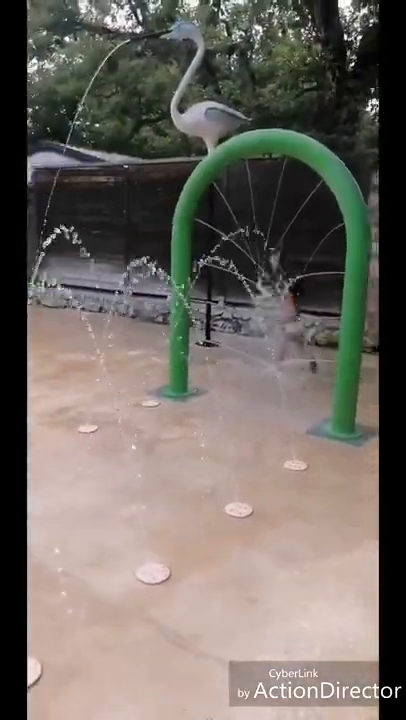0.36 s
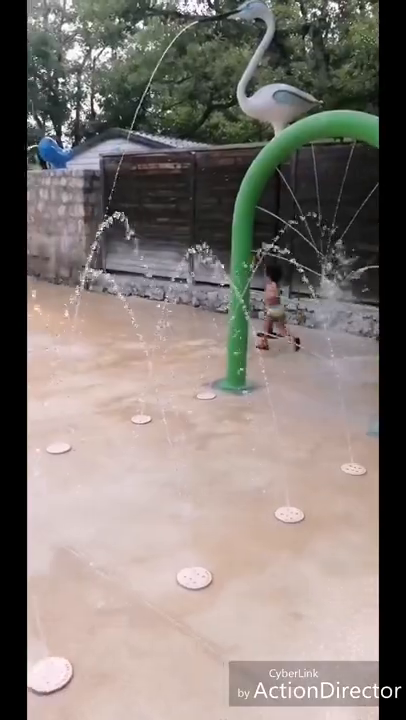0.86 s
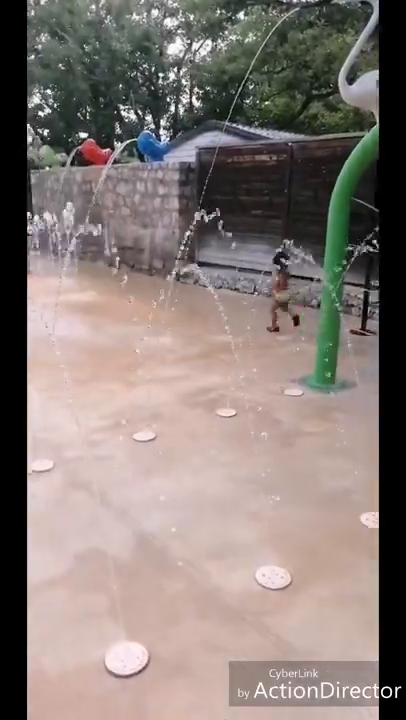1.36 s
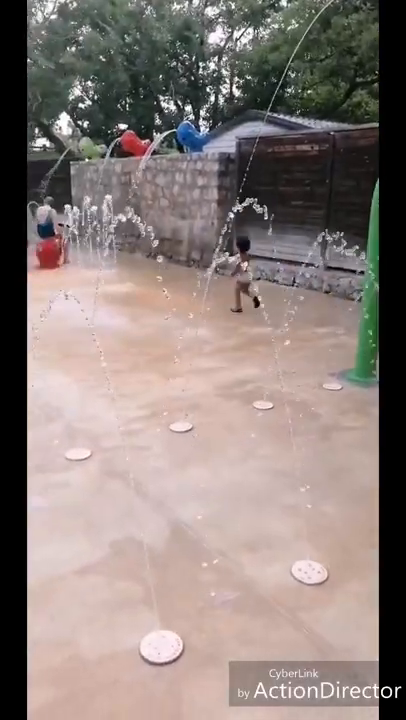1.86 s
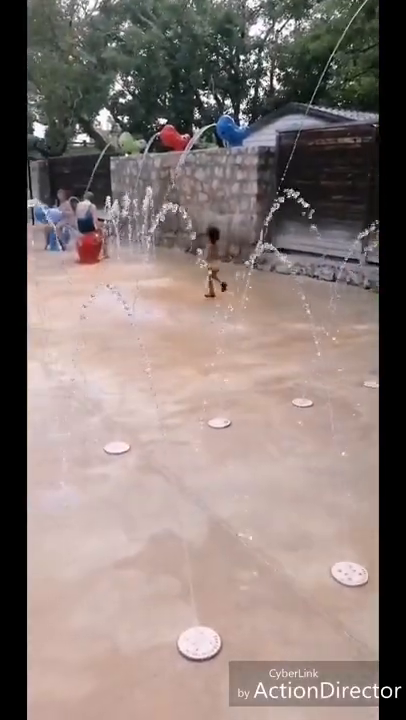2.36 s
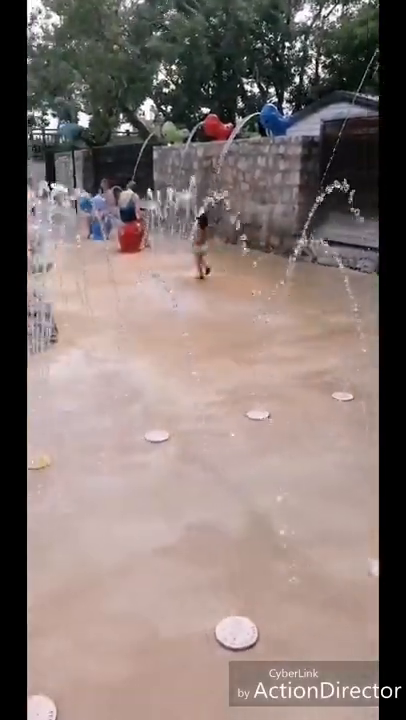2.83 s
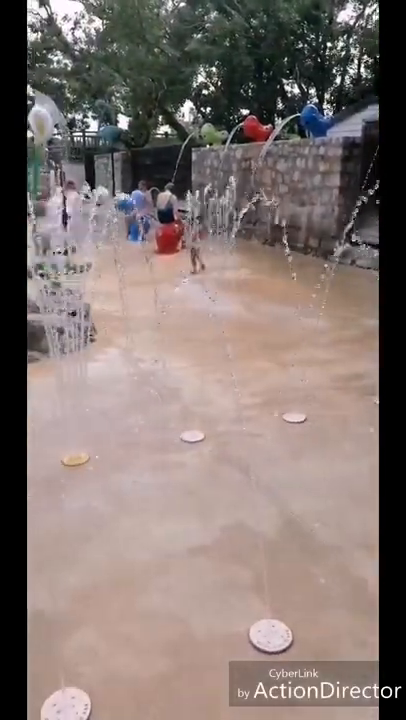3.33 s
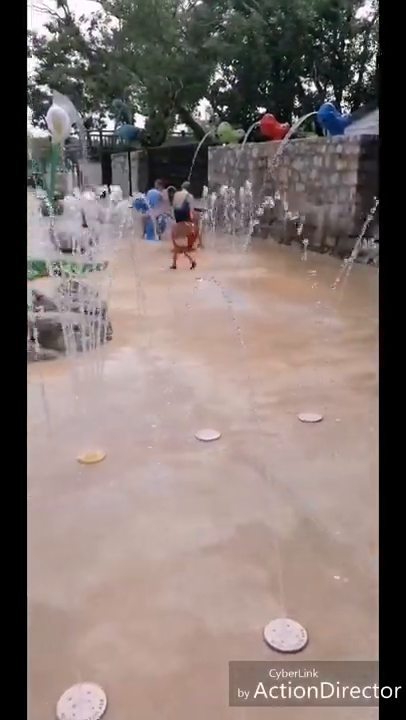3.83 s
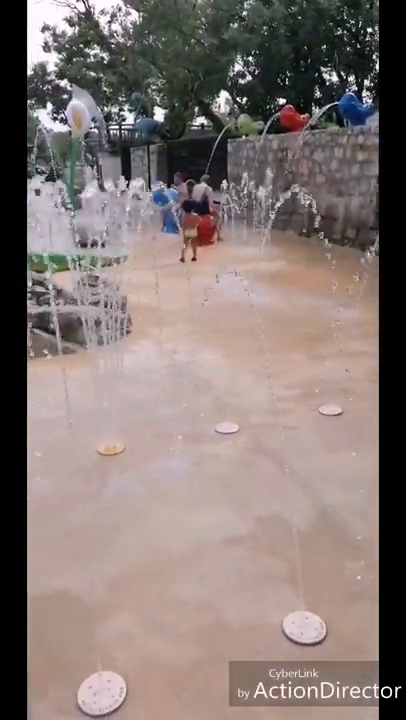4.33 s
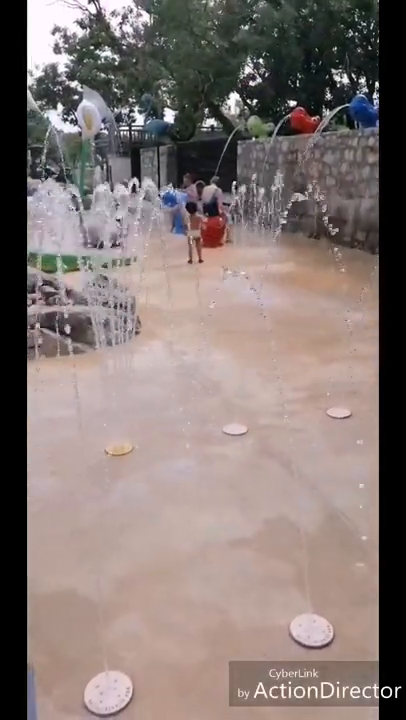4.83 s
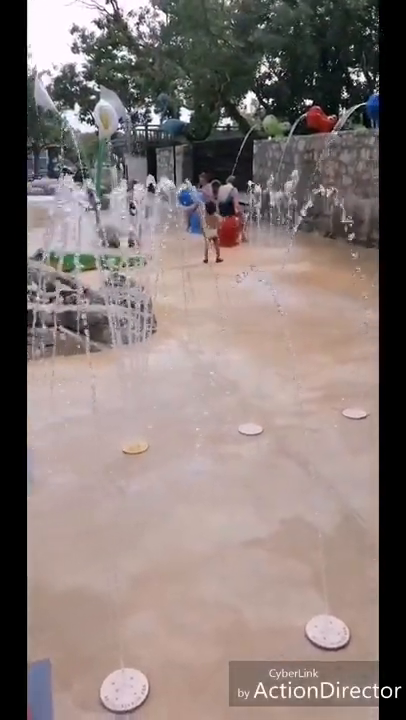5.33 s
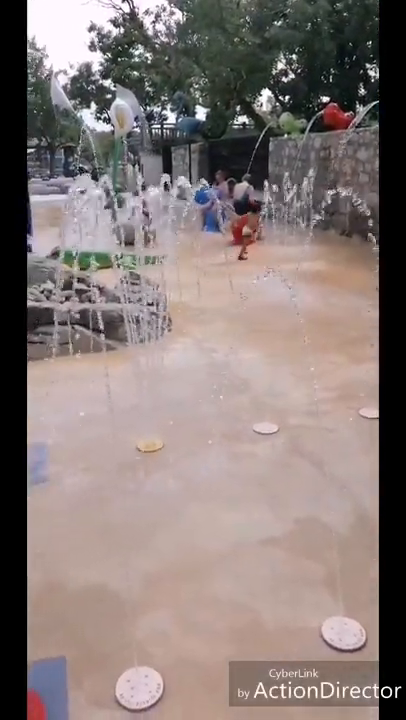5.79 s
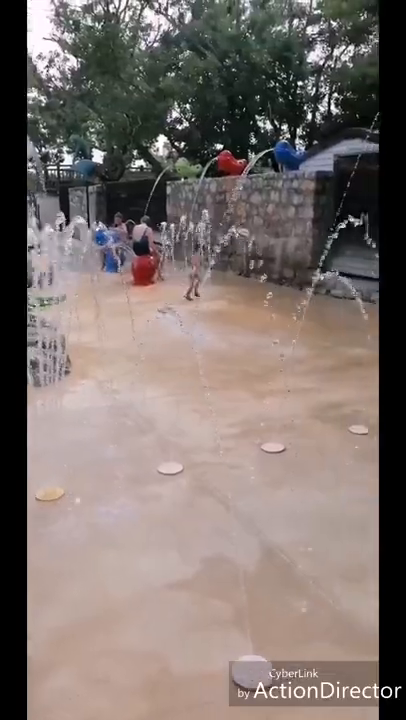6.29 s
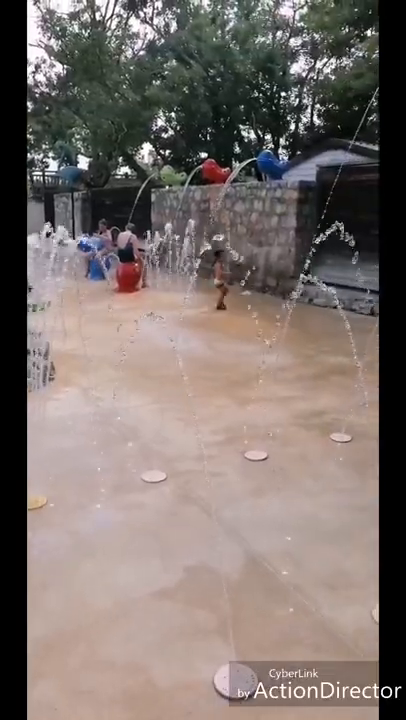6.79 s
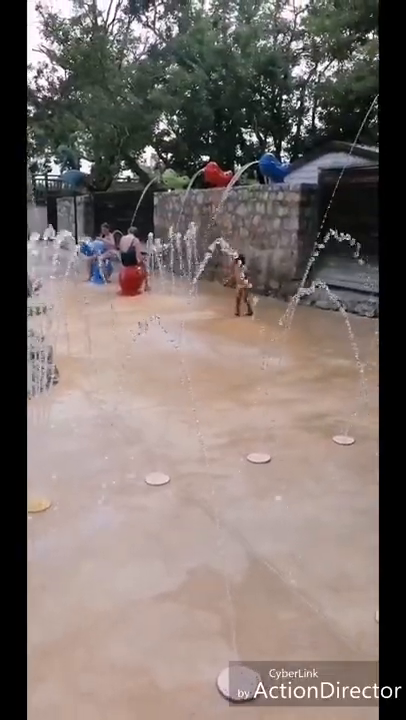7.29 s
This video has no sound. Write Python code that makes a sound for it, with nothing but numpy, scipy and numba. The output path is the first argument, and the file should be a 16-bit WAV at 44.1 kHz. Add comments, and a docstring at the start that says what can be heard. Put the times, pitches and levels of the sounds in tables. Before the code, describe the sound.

Continuous spray from many fountains surrounds the listener, its level nearly constant but quivering as clumps of water land. High crisp ticks and lower wet slaps stand out irregularly, with quiet bubbly plops below. The place is open, with only a slight short reflection off stone. The sound is mono and close, with a momentary dropout late on, and the water continues to the end.

```python
"""Fountain jets on wet concrete

Water jets arc from low nozzles and arches and rain onto concrete around a hand-held phone.
Far off, noise and countless short rings merge into a hiss that throbs as the arcs break into clumps.
Close by, single drops tick, slap and plop as swelling, dying rings; a stone wall throws a little back.
A distant rumble, filtered noise, lies beneath; the sound drops out once."""
import sys
import numpy as np
from scipy import signal
from scipy.fft import rfft, irfft, next_fast_len
from scipy.io import wavfile
from scipy.ndimage import uniform_filter1d
from numba import njit

SR = 44100
rng = np.random.default_rng(int(sys.argv[2]) if len(sys.argv) > 2 else 0)


def store_pcm(level_fs):
    """Save levels as 16-bit WAV."""
    pcm = np.round(np.clip(level_fs, -1, 1) * 32767).astype(np.int16)
    wavfile.write(sys.argv[1], SR, np.atleast_2d(pcm).T)


def voltage_ratio(level):
    """Linear amplitude factor for a level in decibels (scalar or array-like)."""
    return 10 ** (np.asarray(level, float) / 20)


N = 337806

# Falling water as the phone pans: (time [s], fine spray level [dB], heavy drop level [dB])
WATER_LEVELS = [(0, -20.5, -31.5), (1.6, -21, -30), (2.2, -20.5, -30.5), (3.1, -21, -31),
                (5.5, -21.5, -30.5), (6.6, -20.5, -30), (7.66, -20.5, -31)]
# Relative spectrum of the fine spray: (frequency [Hz], level per Hz [dB])
FINE_SPECTRUM = [(2710, -19.5), (4600, -15), (5140, -15.5), (7370, -8.5), (9200, -6.5), (10300, -8.5),
                 (11300, -5.5), (12400, -12), (14900, -21), (15400, -21)]
# Relative spectrum of the heavy drops: (frequency [Hz], level per Hz [dB])
HEAVY_SPECTRUM = [(410, -59), (700, -21.5), (1100, -13.5), (1220, -16), (1440, -13.5), (1790, -7.5),
                  (2140, -9.5), (3100, -7.5), (3780, -14), (4600, -23.5), (5980, -44), (10100, -120)]
# Relative spectrum of the distant rumble: (frequency [Hz], level per Hz [dB])
RUMBLE_SPECTRUM = [(14, -36), (24, -9), (86, -4), (149, -4.5), (205, -0.5), (331, -2.5), (473, 0.5),
                   (528, -2), (573, -3.5), (640, -5), (830, -44), (1410, -120)]
# Loudest small drops on bare concrete, before lag and filter:
# (time [s], ring size [dB], starting pitch [Hz])
LOUD_TICKS = [(0.1324, -9, 11500), (0.172, -3, 9120), (0.4394, -7, 9250), (0.5104, -4, 11400),
              (0.602, -5, 8400), (1.075, -5, 8570), (1.346, -2, 9200), (1.5803, -6, 9140),
              (1.6107, -6, 11100), (1.6781, -8, 8290), (1.8991, -5, 10300), (1.9799, -4, 8910),
              (2.67, -4, 9080), (3.1303, -7, 10800), (3.4027, -7, 8340), (4.4774, -10, 11300),
              (4.6653, -15, 9110), (5.2364, -7, 7960), (5.6111, -4, 11300), (5.6724, -3, 11600),
              (6.5056, -9, 9840), (6.558, -6, 10700), (6.7176, -7, 9510), (6.9644, -5, 8380),
              (7.4066, -8, 9230), (7.5395, -4, 8420), (7.6284, -6, 11000)]
# Loudest heavy drops slapping the water film, before lag and filter:
# (time [s], ring size [dB], starting pitch [Hz])
LOUD_SLAPS = [(0.9343, -14, 1660), (1.2221, -15, 2260), (1.4581, -15, 3230), (1.5644, -9.5, 2560),
              (1.7325, -10, 2560), (2.0143, -13, 2890), (2.3446, -14, 1990), (2.502, -9, 1820),
              (2.6723, -7, 3010), (2.7931, -17, 3010), (2.821, -12, 1760), (3.4072, -5.5, 3010),
              (3.4793, -8, 3140), (3.7584, -12.5, 2120), (3.934, -17, 2720), (4.146, -12, 2790),
              (4.3013, -10.5, 3040), (4.7002, -15, 1960), (5.0586, -10, 2670), (5.2719, -13, 2130),
              (5.4211, -14, 2010), (5.4343, -7, 2370), (5.6661, -6, 2020), (5.8563, -5, 3320),
              (6.0544, -10, 3110), (6.5071, -10, 3000), (6.6398, -11, 2470), (6.7048, -8.5, 1780),
              (6.996, -15, 2760), (7.0668, -9, 3190), (7.5033, -9, 1740)]
# Loudest air pockets trapped in puddles, before the filter:
# (time [s], ring size [dB], starting bubble pitch [Hz])
LOUD_PLOPS = [(0.389, -24, 1160), (0.449, -29, 1150), (0.633, -21, 1080), (1.078, -22, 1060),
              (1.221, -16, 1030), (1.284, -19, 1250), (1.689, -23, 1300), (2.03, -22, 1250),
              (2.287, -21, 1100), (2.314, -25, 1290), (2.484, -22, 966), (2.683, -23, 1110),
              (3.229, -25, 1330), (3.332, -26, 1090), (3.412, -16, 982), (4.301, -20, 1060),
              (4.597, -17, 1150), (5.133, -15, 1090), (5.166, -17, 1150), (5.455, -25, 1030),
              (5.565, -19, 1210), (5.665, -22, 1080), (6.053, -22, 1280), (6.2, -20, 940),
              (6.353, -24, 1170), (6.793, -19, 947), (7.099, -26, 1090), (7.456, -24, 587),
              (7.501, -21, 912)]
# Fade out, then fade in: (silent edge [s], signed length away from it [s], steepness [exponent])
DROPOUT_FADES = [(5.9225, -.026, 2.6), (5.9418, .02, 1)]


def shape(x, table):
    """Colour a sound by (frequency [Hz], level [dB]) points, joined along log frequency."""
    hz, db = np.transpose(table)
    n = next_fast_len(N)
    f = np.maximum(np.arange(n // 2 + 1) * SR / n, 1)
    gain = voltage_ratio(np.interp(np.log(f), np.log(hz), db))
    return irfft(rfft(x, n) * gain, n)[:N]


def unit(x):
    """Scale to rms 1."""
    return x / np.sqrt(np.mean(x ** 2))


def above(x, hz):
    """High-pass: keep what lies above hz, thin out the lows."""
    return signal.sosfilt(signal.butter(2, hz, "high", fs=SR, output="sos"), x)


def walk(rate):
    """Random levels held 1 / rate s and slewed twice; rms 1."""
    hold = int(SR / rate)
    steps = np.repeat(rng.standard_normal(N // hold + 1), hold)
    slewed = uniform_filter1d(uniform_filter1d(steps, hold), hold)
    return unit(slewed[:N])


@njit
def rings(n, start, step, size, cycles, glide, rise):
    """Each drop is a short ring that swells, dies within some cycles and slides up in pitch."""
    out = np.zeros(n)
    for k in range(len(start)):
        w, phase, tail, edge = step[k], 0., size[k], 1.  # w: radians per sample
        fall = np.exp(-w / (2 * np.pi * cycles))
        grow = np.exp(-w / (2 * np.pi * rise))
        up = 1 + glide * (1 - fall)
        i = start[k]
        while tail > .003 * size[k] and i < n and w < 2.8:
            out[i] += tail * (1 - edge) * np.sin(phase)
            phase += w
            w *= up
            tail *= fall
            edge *= grow
            i += 1
    return out


def drops(s, db, hz, cycles, glide, rise):
    """Ring drops given by time, size and starting pitch; decay and rise last so many cycles."""
    start = np.clip(s * SR, 0, N - 1).astype(np.int64)
    step = 2 * np.pi * np.asarray(hz, float) / SR
    return rings(N, start, step, voltage_ratio(db), 1. * cycles, 1. * glide, 1. * rise)


def drop_sizes(chance, spread_db, top_db):
    """Some large drops among many small, in dB; big drops split, so size has a limit."""
    return top_db * np.tanh(-spread_db * np.log(1 - chance) / top_db)


def smacks(clumps, count, spread_db, top_db):
    """Drops that hit flat and give one sharp click over all pitches."""
    when, size, sign = rng.random((count, 3)).T
    share = np.cumsum(voltage_ratio(2.5 * clumps))  # thicker when a clump arrives
    out = np.zeros(N)
    landing = np.searchsorted(share / share[-1], when)
    out[landing] = np.sign(sign - .5) * voltage_ratio(drop_sizes(size, spread_db, top_db))
    return unit(out)


def patter(clumps, count, low_hz, high_hz, spread_db, top_db, cycles, glide):
    """Random ringing drops, some large among many small; they land thicker when a clump arrives."""
    when, pitch, size = rng.random((count, 3)).T
    share = np.cumsum(voltage_ratio(2.5 * clumps))
    s = np.interp(when, share / share[-1], np.arange(N) / SR)
    hz = low_hz * (high_hz / low_hz) ** pitch
    equal_per_hz_db = 20 * np.log10(hz / high_hz)  # equal energy per Hz
    db = drop_sizes(size, spread_db, top_db) + equal_per_hz_db
    return unit(drops(s, db, hz, cycles, glide, rise=0.23))


def falling_water():
    """Hiss of far spray plus patter and flat smacks, fine and heavy, each on its own level."""
    s, *levels = np.transpose(WATER_LEVELS)
    fine_db, heavy_db = (np.interp(np.arange(N) / SR, s, db) for db in levels)
    clumps = .15 * walk(7) + .3 * walk(16) + .3 * walk(50) + .7 * walk(150) + .6 * walk(500)
    fine_hiss, heavy_hiss = rng.standard_normal((2, N)) * voltage_ratio(0.39 * clumps)
    flat = smacks(clumps, count=900, spread_db=5, top_db=16)
    fine_patter = patter(clumps, count=24000, low_hz=4280, high_hz=15700,
                         spread_db=2, top_db=11, cycles=1.57, glide=0.039)
    heavy_patter = patter(clumps, count=8000, low_hz=588, high_hz=4830,
                          spread_db=1.5, top_db=10, cycles=1.26, glide=0.09)
    fine = fine_hiss + voltage_ratio(-12) * flat + voltage_ratio(-3) * fine_patter
    heavy = heavy_hiss + voltage_ratio(-5.5) * flat + voltage_ratio(-3.5) * heavy_patter
    fine = unit(shape(above(fine, hz=2430), FINE_SPECTRUM))
    heavy = unit(shape(heavy, HEAVY_SPECTRUM))
    surge_db = 0.44 * walk(10)  # the supply pressure wavers under all jets at once
    return fine * voltage_ratio(fine_db + surge_db) + heavy * voltage_ratio(heavy_db + surge_db)


def town():
    """Low rumble from afar: shaped noise in which each half octave swells on its own."""
    noise = unit(shape(rng.standard_normal(N), RUMBLE_SPECTRUM))
    out = 0
    for hz in 17 * 2 ** (np.arange(12) / 2):
        half_octave = signal.butter(2, [hz, hz * np.sqrt(2)], "band", fs=SR, output="sos")
        swell_db = 2.2 * walk(3.103) + 1.46 * walk(25)
        out = out + signal.sosfiltfilt(half_octave, noise) * voltage_ratio(swell_db)
    return unit(out) * voltage_ratio(-47.5)


def strays(count, top_db, range_db, low_hz, high_hz):
    """Quieter near drops at random moments, as rows (time [s], ring size [dB], pitch [Hz])."""
    when, size, pitch = rng.random((count, 3)).T
    hz = low_hz * (high_hz / low_hz) ** pitch
    return np.transpose([when * N / SR, top_db - range_db * size, hz])


def splashes(table, count, within_s, scatter, below_db, cycles, glide, rise):
    """Each drop lands, then throws a crown of smaller droplets at nearby pitches."""
    s, db, hz = np.transpose(table)[:, :, None]
    late, tune = rng.random((len(table), 2, count)).transpose(1, 0, 2)
    s = s + .0006  # lag [s]
    crown_s = s + within_s * late
    crown_db = db + below_db * (.5 + late)  # later droplets are weaker
    crown_hz = np.minimum(hz * np.exp(scatter * (2 * tune - 1)), 14000)
    landing = drops(s.ravel(), db.ravel(), hz.ravel(), cycles, glide, rise)
    crown = drops(crown_s.ravel(), crown_db.ravel(), crown_hz.ravel(), cycles, glide, rise)
    return landing + crown


def concrete_ticks():
    """Small drops on bare concrete ring high and longest in cycles."""
    small = strays(count=36, top_db=-9, range_db=4, low_hz=7500, high_hz=11500)
    ticks = splashes(np.vstack([LOUD_TICKS, small]), count=5, within_s=0.0014, scatter=0.26,
                     below_db=-4, cycles=3.9, glide=0.0066, rise=0.39)
    return above(ticks, hz=5500)


def puddle_plops():
    """Air pockets trapped in puddles ring low and slide up in pitch."""
    small = strays(count=55, top_db=-22, range_db=9.5, low_hz=920, high_hz=1400)
    table = np.vstack([LOUD_PLOPS, small])
    plops = drops(*np.transpose(table), cycles=1.47, glide=0.034, rise=0.29)
    return above(plops, hz=378)


def film_slaps():
    """Heavy drops slapping the water film ring lower than ticks and die within few cycles."""
    small = strays(count=65, top_db=-13, range_db=6, low_hz=1620, high_hz=3270)
    slaps = splashes(np.vstack([LOUD_SLAPS, small]), count=4, within_s=0.00304, scatter=0.42,
                     below_db=-8, cycles=1.23, glide=0.02, rise=0.25)
    return above(slaps, hz=1200)


def bounce(x, wall_db, t60_s):
    """Add a short scattered tail off walls and poles: noise that decays 60 dB in t60_s."""
    t = np.arange(SR // 5) / SR
    echo = voltage_ratio(wall_db) * rng.standard_normal(len(t)) * voltage_ratio(-60 * t / t60_s)
    echo[0] = 1  # direct sound
    return signal.fftconvolve(x, echo)[:N]


def top_cut(x):
    """Steep low-pass: almost nothing is left over the top frequency."""
    top_hz = 15500
    return shape(x, [(top_hz, 0), (1.01 * top_hz, -80)])


def scene():
    """Spray all around, rumble far off, single drops close by, mixed to one channel."""
    near_drops = concrete_ticks() + puddle_plops() + film_slaps()
    near = bounce(near_drops, wall_db=-28.5, t60_s=0.12)
    return top_cut(falling_water() + town() + near)[None]


def band_limit(x):
    """A steep low-pass at the top of the band."""
    return signal.sosfilt(signal.butter(12, 16030, fs=SR, output="sos"), x)


def record(dry):
    """For one lost moment the sound fades steeply to silence and back."""
    t = np.arange(N) / SR
    fade = 0
    for edge_s, length_s, steepness in DROPOUT_FADES:
        away = np.clip((t - edge_s) / length_s, 0, 1)  # 0 at the silent edge, 1 at full level
        fade = fade + np.sin(np.pi / 2 * away) ** steepness
    return band_limit(dry * fade)


dry = scene()
out = record(dry)
store_pcm(out)
```